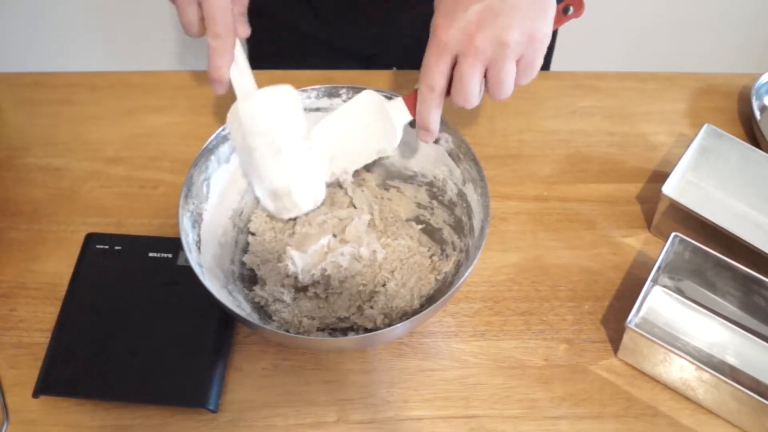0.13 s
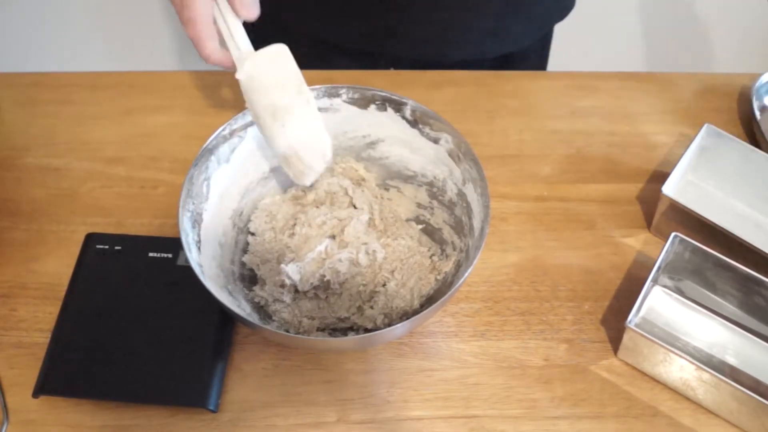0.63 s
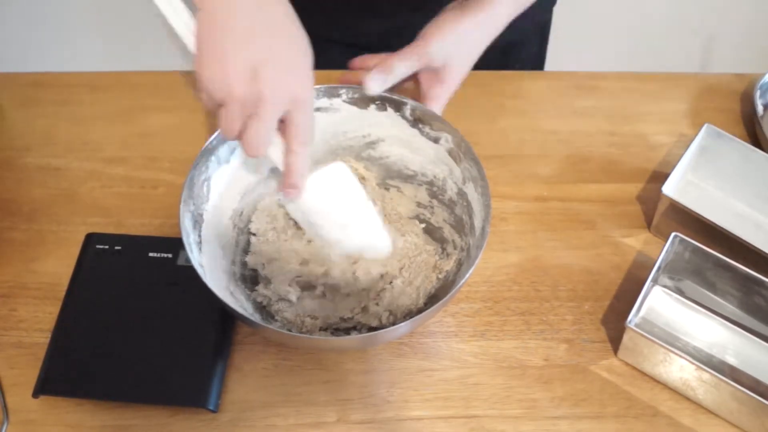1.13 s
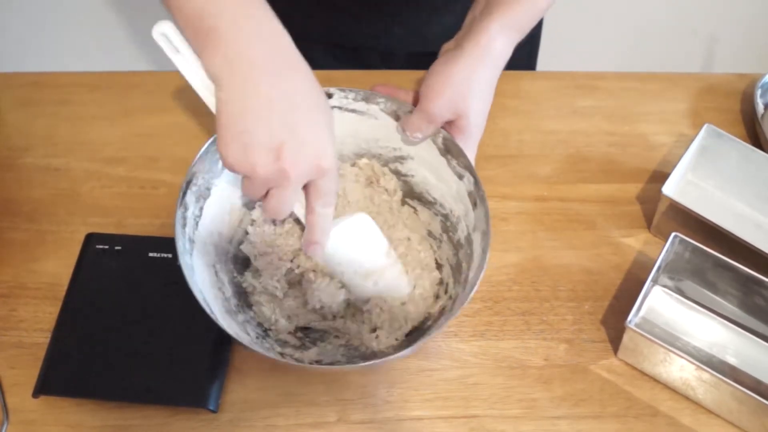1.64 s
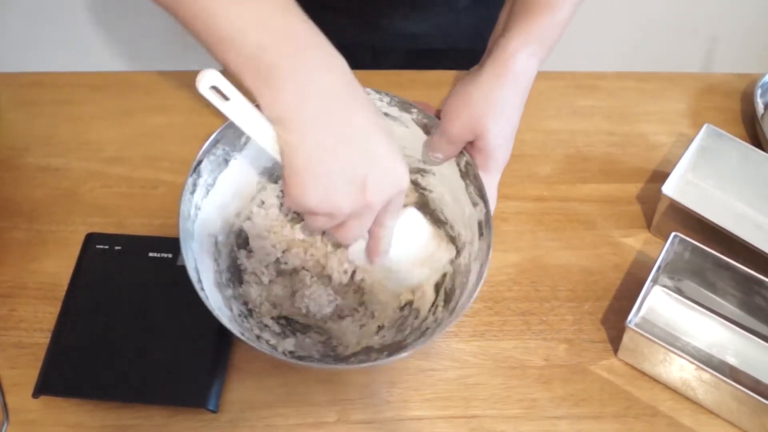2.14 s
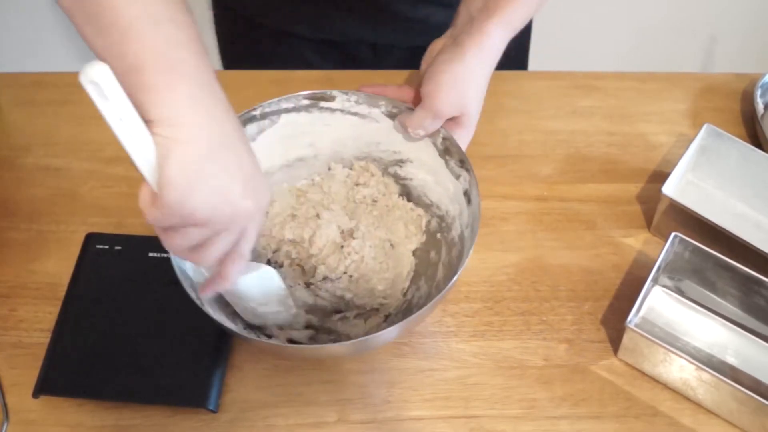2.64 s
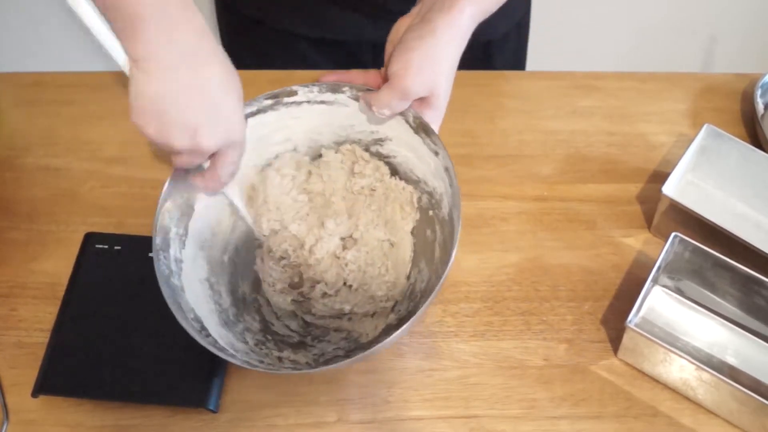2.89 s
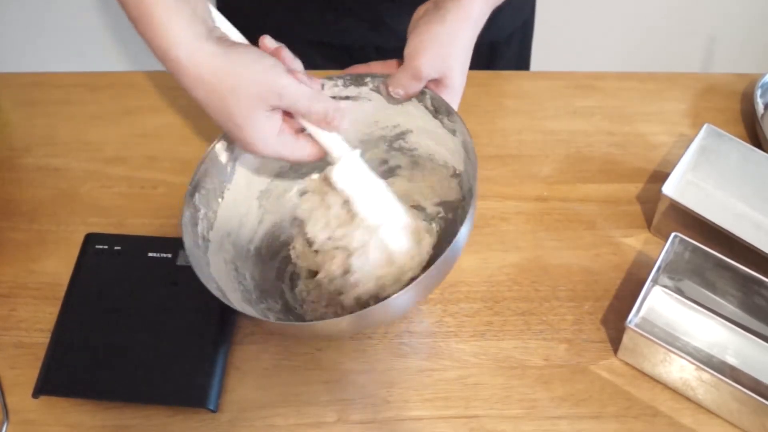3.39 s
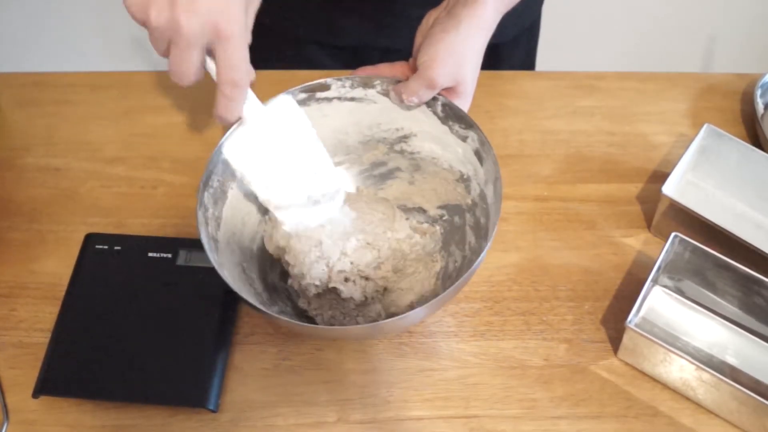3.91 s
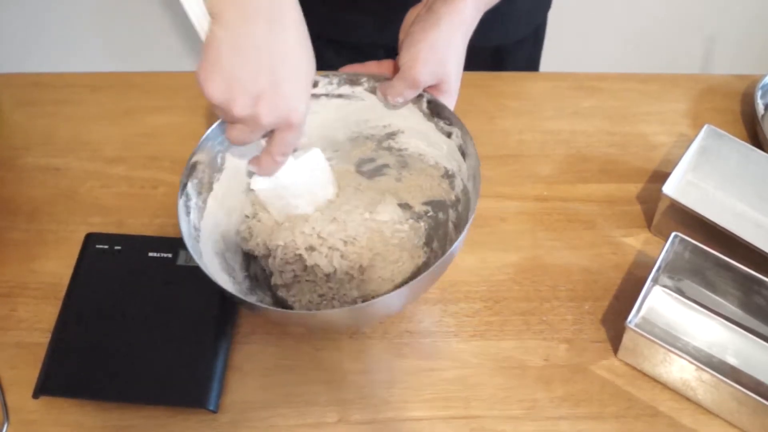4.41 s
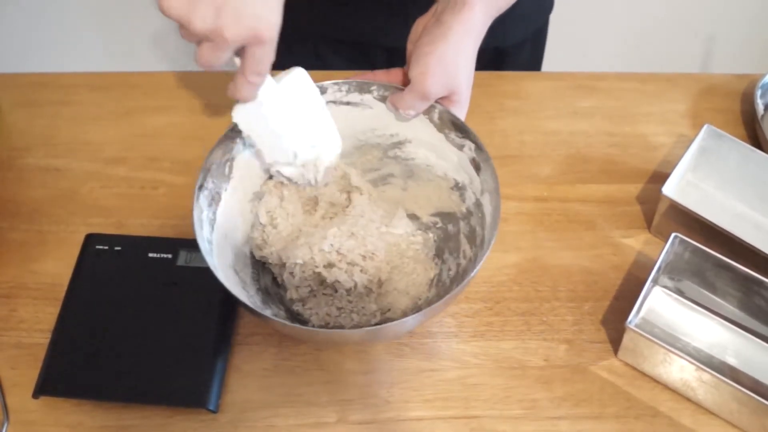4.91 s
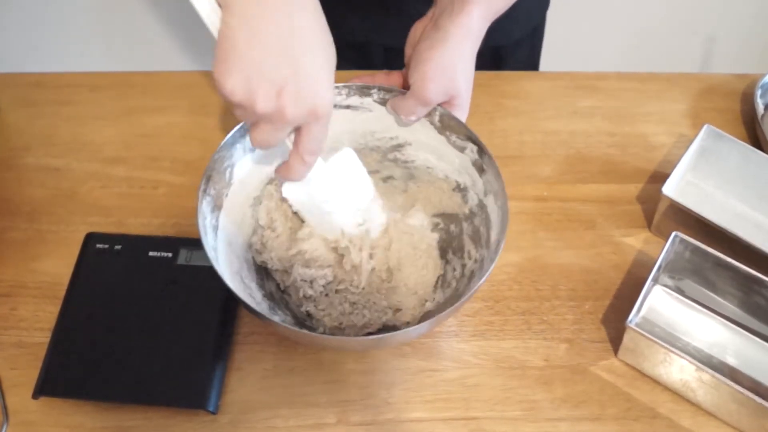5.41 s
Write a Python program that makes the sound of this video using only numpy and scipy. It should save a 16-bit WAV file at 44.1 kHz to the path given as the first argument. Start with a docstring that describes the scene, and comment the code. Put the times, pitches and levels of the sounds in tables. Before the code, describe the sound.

Quiet room tone and tiny wet ticks, then a bright rattling metal clatter as a spatula is dropped. Dough mixing follows in irregular strokes: dull, dough-damped bowl knocks, gritty scraping, sticky crackling and small snaps. A thinner, sharper scrape comes near three seconds, then near quiet, a strong thump with a rasp, light bumps and a last double knock. Close, slightly clipped sound with short kitchen reverberation.

```python
"""A spatula works sticky dough in a steel bowl on a wooden table, in a small hard-walled kitchen.
Bowl knocks are impacts that ring damped modes; drags and scrapes are stick-slip clicks filtered by the bowl.
The dough tears with a wet crackle of fine clicks, and a second spatula is dropped into a metal tray.
Diffuse reflections, room air and mains hum surround them; a close microphone overloads on the hardest knocks."""
import sys
import numpy as np
from scipy import signal
from scipy.fft import rfft, irfft
from scipy.io import wavfile

SR = 44100
rng = np.random.default_rng(int(sys.argv[2]) if len(sys.argv) > 2 else 0)


def level_to_linear(level):
    """Convert decibel levels to linear amplitude factors, elementwise."""
    exponent = np.asarray(level, float) / 20
    return 10 ** exponent


def unload_wav(signal):
    """Save mono or channel-first audio to the path in sys.argv[1] as 16-bit WAV at rate SR, clipped to [-1, 1]."""
    wavfile.write(
        sys.argv[1],
        SR,
        np.round(np.clip(np.atleast_2d(signal).T, -1, 1) * 32767).astype(np.int16),
    )


N = 244314

# knocks of the bowl and spatula; clack and crack are relative to the thud:
# start_s, level_db, pitch_hz, clack_db, crack_db
BOWL_KNOCKS = [(1.193, -6.5, 277, -32, -34), (1.273, -6, 137, 1, -15), (1.376, -3.5, 302, -16, -32),
               (1.432, -9.5, 205, -22, -29), (1.622, -15.5, 192, -1, -28), (1.78, -5, 203, -18, -24),
               (1.796, -2, 207, -15, -24), (1.968, -4, 120, 12, -31), (2.008, 5.5, 136, -15, -21),
               (2.019, -4.5, 300, -11, -24), (2.248, 10, 144, -29, -27), (2.281, -3, 131, -6, -14),
               (2.302, -8, 297, -1, -19), (2.433, -3.5, 141, 6, -11), (2.468, -6, 136, -12, -36),
               (2.488, -6, 300, -8, -29), (2.776, -8.5, 732, 17.5, 11), (3.427, -28, 195, 4, -5),
               (4.346, 10.5, 320, -9.5, -14), (4.661, -3.5, 152, -33, -23), (4.846, -8.5, 206, -30, -23),
               (4.932, -14, 146, 0, -4.5), (5.134, -10.5, 212, -7.5, -38), (5.209, -6, 275, -25, -29),
               (5.444, 1, 116, -2, -25), (5.485, 5, 140, -3.5, -22)]
# blows of the spatula falling into the tray: start_s, level_db, pitch_hz, clack_db, crack_db
TRAY_DROPS = [(0.772, 0, 560, -33, -38), (0.789, 1.5, 486, -2.5, -20), (0.826, 10.5, 684, -24, -48),
              (0.833, 7, 510, -0.5, -13), (0.828, -17, 71, 14, -40), (1.0, -11, 172, -34, -35)]
# modes of bowl and table top, damped by dough and hand: frequency_hz, relative_level_db, t60_s
BOWL_MODES = [(38, -12, .1), (60, -11, .1), (137, -1, .2), (183, -5, .12), (240, -11, .05), (302, -7, .07),
              (372, -8, .05), (433, -9, .04), (521, -8, .04), (598, -7, .04), (660, -6, .04),
              (840, -6, .02), (980, -7, .025), (1216, -7, .015), (1500, -8, .012), (1820, -9, .012),
              (2450, -9, .01), (2800, -10, .01), (3250, -12, .008)]
# modes of tray and counter: frequency_hz, relative_level_db, t60_s
TRAY_MODES = [(58, 3, .4), (178, -1.5, .25), (371, -5, .06), (533, -2, .035), (678, 0, .03),
              (1000, -5, .012), (1728, -6, .006), (2444, -6, .006), (2859, -7, .006), (3400, -7, .006),
              (4447, -7, .01), (5017, -6, .016), (5319, -6, .016), (5927, -7, .01), (7400, -13, .006),
              (8500, -14, .015)]
# strokes of the blade; drive of the base on the table and of the blade on the steel:
# start_s, hold_s, base_db, blade_db, sharpness (0-1)
BLADE_STROKES = [(1.14, 0.037, -32, -42, 0.15), (1.185, 0.0067, -23, -37, .24),
                 (1.269, 0.0029, -20, -21.5, 0.1), (1.375, .005, -28.5, -37.5, .02),
                 (1.43, .02, -40, -40.5, 0.08), (1.62, 0.018, -31.5, -32, 0.13),
                 (1.782, 0.0034, -16, -28.5, 0.11), (1.978, 0.056, -16, -20, 0.17),
                 (2.25, .005, -21, -17.5, 0.14), (2.29, 0.01, -8, -13.5, 0.16),
                 (2.442, 0.045, -10.5, -18.5, .1), (2.632, 0.32, -32, -38, 0.85),
                 (2.771, 0.0037, -36, -13, 0.58), (2.952, 0.14, -24.5, -30, 0.79),
                 (3.155, .05, -53, -32.5, 0.51), (3.32, 0.052, -37, -48.5, 0.07),
                 (4.363, .16, -12, -10, 0.39), (4.699, 0.045, -24, -30.5, .5), (4.79, 0.04, -24, -40.5, .1),
                 (4.857, 0.011, -20.5, -35.5, 0.47), (4.935, 0.0045, -21.5, -35, 0.15),
                 (5.09, 0.053, -31, -49, 0), (5.13, 0.015, -25, -33, 0), (5.222, 0.0093, -29, -39.5, 0),
                 (5.296, 0.031, -34, -50, 1), (5.38, 0.046, -37.5, -58, 0.16),
                 (5.455, 0.009, -12, -21.5, 0.16), (5.49, .05, -9, -22.5, 0.48)]
# judder of the blade while the bowl is tilted: start_s, hold_s, drive_db
BLADE_JUDDER = [(2.915, .2, -30)]
# pulls that stretch and tear the dough: start_s, hold_s, drive_db, centre_hz
DOUGH_PULLS = [(0.0, 0.089, -49.5, 5070), (.234, 0.054, -52, 6140), (0.473, .01, -50.5, 6500),
               (0.608, 0.065, -50.5, 5600), (1.12, .03, -42.5, 5900), (1.177, .01, -37, 6260),
               (1.195, 0.012, -25.5, 6500), (1.625, 0.27, -38.5, 6200), (1.973, .005, -34, 5140),
               (2.066, 0.027, -24, 5930), (2.29, 0.055, -33, 5100), (2.436, 0.59, -32.5, 6450),
               (2.79, 0.15, -29, 5800), (3.062, 0.14, -31, 6500), (3.303, 0.011, -36, 5600),
               (3.424, .02, -39.5, 6600), (3.685, .005, -43.5, 7000), (3.775, 0.017, -45, 5600),
               (4.003, 0.018, -44, 5200), (4.148, 0.045, -42, 5500), (4.419, 0.12, -26, 5430),
               (4.845, 0.089, -37.5, 5560), (5.106, .005, -44, 6340), (5.303, 0.019, -40, 6500),
               (5.472, .005, -34.5, 5280)]
# dough pulling off the blade, level of each burst before its noise and filter: start_s, level_db
DOUGH_SNAPS = [(1.1694, -22), (1.195, -12), (1.5908, -34), (2.0393, -19), (3.233, -21.5), (3.2956, -15.5),
               (3.427, -33), (3.45, -26), (3.532, -30.5), (3.7116, -28), (4.842, -40), (4.922, -29),
               (5.103, -34), (5.2916, -35), (5.306, -23.5), (5.477, -27)]
# reverberation time of the kitchen: frequency_hz, t60_s
ROOM_DECAY = [(60, 0.29), (400, 0.32), (2000, 0.49), (9000, 0.39)]
# spectrum of the room air, relative: frequency_hz, level_db
AIR_SPECTRUM = [(12, -34), (20, 7), (55, -3.5), (108, 1.5), (239, -6.5), (303, -7), (806, -12), (1020, -15),
                (1110, -13.5), (2260, -16), (2640, -15.5), (6320, -26), (11000, -20.5), (14300, -47),
                (22000, -120)]
# mains hum, peak level about which it wavers: frequency_hz, level_db
MAINS_HUM = [(100, -49), (300, -55)]
# filter that makes the side signal fainter than the mid: frequency_hz, gain_db
SIDE_GAIN = [(60, -31.5), (220, -29), (840, -21.5), (3130, -14.5), (11700, -7.5)]

STROKE_RISE_DB_PER_S, BLADE_FALL_DB_PER_S = 4000, 115.5


def rms_one(x):
    """Energy normalisation: scale to unit rms."""
    return x / np.sqrt(np.mean(x ** 2) + 1e-20)


def at_hz(points, hz):
    """Spectral interpolation on a log-frequency axis."""
    points_hz, values = np.array(points).T
    return np.interp(np.log(hz + 1), np.log(points_hz), values)


def cut(x, hz, kind, order=2):
    """Maximally flat (Butterworth) filtering."""
    return signal.sosfilt(signal.butter(order, hz, kind, fs=SR, output="sos"), x)


def drift(rate_hz):
    """Slow random fluctuation: one-pole filtered noise of unit rms, drawn 60 times a second."""
    steps = rng.standard_normal(6 * 60 + 4)
    r = np.exp(-2 * np.pi * rate_hz / 60)
    slow = signal.lfilter([1], [1, -r], steps)
    return np.interp(np.arange(N) / SR * 60, np.arange(len(slow)), rms_one(slow))


def ring(force, hz, t60_s):
    """Modal resonance: one damped oscillator driven by a force."""
    r = level_to_linear(-60 / (t60_s * SR))
    w = 2 * np.pi * hz / SR
    return signal.lfilter([0, np.sin(w)], [1, -2 * r * np.cos(w), r * r], force + 1e-18)


def grains(per_s, spread_db):
    """Stochastic micro-impacts: random clicks of uneven size and sign, of unit rms."""
    sizes = level_to_linear(spread_db * np.minimum(rng.exponential(1, N), 4))
    signs = rng.choice([-1, 1], N)
    return rms_one(sizes * signs * (rng.random(N) < per_s / SR))


def swells(start_s, hold_s, db, rise_db_per_s, fall_db_per_s):
    """Exponential growth and decay: level in dB of the loudest event, and its index, at each sample."""
    t = np.arange(0, N, 32)[None] / SR - np.c_[start_s]   # one point every 32 samples
    before_s = np.maximum(-t, 0)
    after_s = np.maximum(t - np.c_[hold_s], 0)
    each_db = np.c_[db] - rise_db_per_s * before_s - fall_db_per_s * after_s
    level_db = np.interp(np.arange(N) / 32, np.arange(t.shape[1]), each_db.max(axis=0))
    loudest = np.repeat(each_db.argmax(axis=0), 32)[:N]
    return level_db, loudest


def blows(events, modes, ring_db, click_db, pick_db, crack_s, chatter_db, chatter_s, chatter_hz):
    """Impact excitation: a low swing, a clack that rings the modes, a crack and dying loose chatter."""
    out, t = np.zeros(N + SR), np.arange(SR // 2) / SR
    luck = rng.standard_normal((len(events), len(modes)))
    hiss = rng.standard_normal((len(events), 2, len(t)))
    for (start_s, db, hz, clack_db, crack_db), odds, (fine, loose) in zip(events, luck, hiss):
        thud = -np.sin(2 * np.pi * hz * t) * np.exp(-t * hz / .9)
        thud = thud * (1 - np.exp(-t * hz * 8))   # soft start: dough cushions the contact

        # gentle contacts are duller
        clack_hz = np.clip(2050 * level_to_linear(0.27 * (db + clack_db)), 500, 2600)
        clack = cut(1.0 * (t == 0), clack_hz, "low")
        chatter = cut(loose * abs(loose), chatter_hz, "low")
        chatter = chatter * (1 - np.exp(-t / 0.0013)) * np.exp(-t / chatter_s)
        chatter = chatter / np.sqrt(np.sum(chatter ** 2))
        force = level_to_linear(clack_db) * clack + level_to_linear(chatter_db) * chatter
        # a small hard contact misses the deepest modes
        force = cut(force, 0.66 * hz, "high", order=4)

        body = 0
        for (mode_hz, mode_db, t60_s), k in zip(modes, odds):
            # a hard contact picks out the modes near its swing
            near_db = pick_db * np.log2(hz / 125) * np.exp(-(np.log(mode_hz / hz) / 0.29) ** 2)
            body = body + level_to_linear(mode_db + near_db + 1.5 * k) * ring(force, mode_hz, t60_s)
        crack = cut(fine, [1600, 5000], "band", order=1) * np.exp(-t / crack_s)

        sound = thud + level_to_linear(ring_db) * body + level_to_linear(click_db) * force + level_to_linear(crack_db) * crack
        at = round(start_s * SR)
        out[at:at + len(t)] += level_to_linear(db) * sound
    return out[:N]


def bowl_knocks():
    """Impact on a damped shell: short blows ring the modes of bowl and table top."""
    return blows(BOWL_KNOCKS, BOWL_MODES, ring_db=-5.5, click_db=-8.5, pick_db=2.5, crack_s=0.0041,
                 chatter_db=-19, chatter_s=0.0068, chatter_hz=1390)


def rubbing():
    """Stick-slip friction: dull clicks from the base and dense sharp ones from the blade drive the bowl."""
    start_s, hold_s, base_db, blade_db, sharp = np.transpose(BLADE_STROKES)
    # a stroke that comes with a knock peaks 8 ms after it
    knocks_s = np.array(BOWL_KNOCKS)[:, 0]
    nearest_s = knocks_s[abs(np.c_[start_s] - knocks_s).argmin(axis=1)]
    start_s = np.where(abs(start_s - nearest_s) < .04, nearest_s + .008, start_s)

    # the slower rise lets the bowl start to slide before the blade bites
    base_db, _ = swells(start_s, hold_s, base_db, rise_db_per_s=1600, fall_db_per_s=186)
    blade_db, now = swells(start_s, hold_s, blade_db, STROKE_RISE_DB_PER_S, BLADE_FALL_DB_PER_S)
    base = level_to_linear(base_db) * rms_one(cut(grains(900, spread_db=1.5), [30, 260], "band"))
    grit = level_to_linear(blade_db + 2.5 * drift(20)) * grains(2500, spread_db=3)

    # a faster, harder stroke sounds higher: crossfade between four bands
    corners_hz = [694, 1292, 2340, 3800]
    step = np.clip(sharp[now], 0, 1) * (len(corners_hz) - 1)
    blade = 0
    for k, hz in enumerate(corners_hz):
        band = cut(cut(grit, hz, "low", order=3), hz / 1.9, "high", order=1)
        blade = blade + np.maximum(1 - abs(step - k), 0) * band / np.sqrt(hz / SR)

    low = sum(level_to_linear(db) * ring(base, hz, t60_s) for hz, db, t60_s in BOWL_MODES[:6])
    high = sum(level_to_linear(db) * ring(blade, hz, t60_s) for hz, db, t60_s in BOWL_MODES[4:])
    return level_to_linear(-43.5) * low + level_to_linear(-31.0) * high + level_to_linear(4) * blade


def judder():
    """Relaxation oscillation: the blade edge sticks and jumps, and each slip rings two upper bowl modes."""
    slips_per_s, unevenness = 68, .3
    db, _ = swells(*np.transpose(BLADE_JUDDER), STROKE_RISE_DB_PER_S, BLADE_FALL_DB_PER_S)
    turns = np.cumsum(slips_per_s * (1 + unevenness * drift(25))) / SR
    slips = np.diff(np.floor(turns), prepend=0) > 0
    slips = slips * level_to_linear(3 * rng.standard_normal(N))
    rung = sum(level_to_linear(mode_db) * ring(slips, hz, t60_s) for hz, mode_db, t60_s in BOWL_MODES[-3:-1])
    return level_to_linear(db) * rms_one(rung)


def dough():
    """Fracture noise: threads tear in fine clicks coloured by the wet gap under the blade; larger ones snap."""
    start_s, hold_s, db, centre_hz = np.transpose(DOUGH_PULLS)
    db, now = swells(start_s, hold_s, db, rise_db_per_s=446, fall_db_per_s=89)
    clicks = grains(6000, spread_db=0.5)
    gap = 0
    for hz in np.geomspace(3800, 9000, 10):
        band = cut(clicks, [hz / 1.1, hz * 1.1], "band", order=1)
        weight = np.exp(-(np.log(centre_hz / hz) / .1) ** 2)   # bands near each pull's centre
        gap = gap + weight[now] * band
    crackle = level_to_linear(-5) * cut(clicks, 2500, "high", order=1) + level_to_linear(2) * gap
    tear = level_to_linear(db + drift(20)) * crackle

    snaps = np.zeros(N)
    for snap_s, level_db in DOUGH_SNAPS:
        snaps[round(snap_s * SR)] = level_to_linear(level_db)
    fade = signal.lfilter([1], [1, -np.exp(-1 / (0.0034 * SR))], snaps)   # 3.4 ms decay
    burst = fade * rng.standard_normal(N)
    return tear + cut(burst, 3400, "high")


def tray_drops():
    """Impact on a thin plate: the falling spatula rings tray and counter, with long bright chatter."""
    return blows(TRAY_DROPS, TRAY_MODES, ring_db=-13, click_db=2.0, pick_db=0.0, crack_s=0.0083,
                 chatter_db=-9, chatter_s=0.05, chatter_hz=6500)


def kitchen(x):
    """Diffuse reverberation: noise that dies band by band, one for the mid and one for the side."""
    t = np.arange(SR) / SR
    edges_hz = 40 * 2 ** np.arange(0, 8.6, 1)
    echo = 0
    for low, high in zip(edges_hz, edges_hz[1:]):
        decay = level_to_linear(-60 * t / at_hz(ROOM_DECAY, np.sqrt(low * high)))
        echo = echo + decay * cut(rng.standard_normal((2, SR)), [low, high], "band")
    echo = echo * (1 - np.exp(-t / 0.0014)) * (t > .004)   # silent for the first 4 ms
    echo /= np.sqrt(np.sum(echo[0] ** 2))
    return signal.fftconvolve(x[None], echo, axes=1)[:, :N]


def air():
    """Stationary background: shaped noise in mid and side, and a wavering mains hum in the mid."""
    hz = np.arange(N // 2 + 1) * SR / N
    spectrum = rfft(rng.standard_normal((2, N))) * level_to_linear(at_hz(AIR_SPECTRUM, hz))
    noise = rms_one(irfft(spectrum, N)) * level_to_linear(-42 + drift(36))
    t = np.arange(N) / SR
    hum = sum(level_to_linear(db + 2 * drift(0.8)) * np.sin(2 * np.pi * f * t) for f, db in MAINS_HUM)
    return noise + [[1], [0]] * hum


def spread(mid, side):
    """Mid-side stereophony: the side signal is fainter and grows toward the treble."""
    hz = np.arange(N // 2 + 1) * SR / N
    side = irfft(rfft(side) * level_to_linear(at_hz(SIDE_GAIN, hz)), N)
    return np.array([mid + side, mid - side])


def scene():
    """Superposition of direct sound, room and air."""
    knocks, drops = bowl_knocks(), tray_drops()
    rub, wet = rubbing() + judder(), dough()
    room = kitchen(level_to_linear(-7) * knocks + level_to_linear(-3.5) * drops + level_to_linear(-11.5) * rub + level_to_linear(-14) * wet)
    mid, side = room + air()
    return spread(mid + knocks + drops + rub + wet, level_to_linear(0.5) * side)


def top_cut(x):
    """Nothing passes above the cut-off."""
    return signal.sosfilt(signal.butter(12, 12300, fs=SR, output="sos"), x)


def record(dry):
    """Dynamic compression: gain ducks after loud knocks, too late for their first swing, which clips."""
    release_db = 45 * np.arange(N) / SR   # 45 dB a second
    level_db = 20 * np.log10(abs(dry).max(axis=0) + 1e-9)
    held_db = np.maximum.accumulate(level_db + release_db) - release_db
    r = np.exp(-1 / (.004 * SR))   # the gain follows in 4 ms
    excess_db = np.maximum(held_db + 20, 0)   # above a threshold of -20 dB
    duck_db = signal.lfilter([1 - r], [1, -r], .3 * excess_db)
    loud = np.clip(dry * level_to_linear(-duck_db), -1, 1)
    # steep low-pass, 60 dB down from 11700 Hz up
    low_pass = signal.cheby2(12, 60, 11700, fs=SR, output="sos")
    mix = signal.sosfilt(low_pass, loud)
    return top_cut(mix)


dry = scene()
out = record(dry)
unload_wav(out)
```